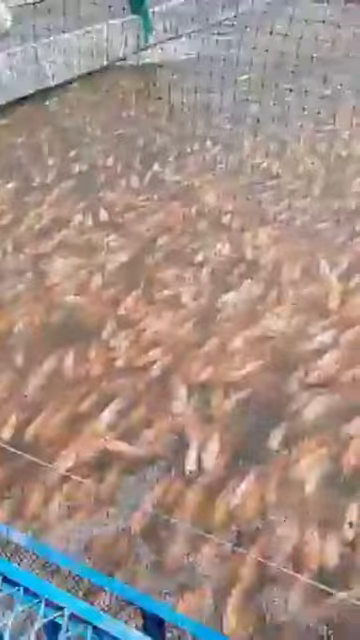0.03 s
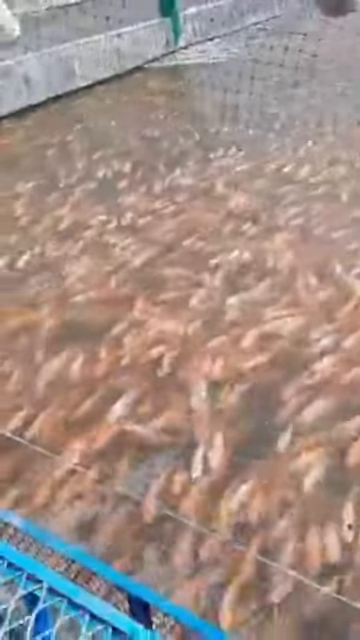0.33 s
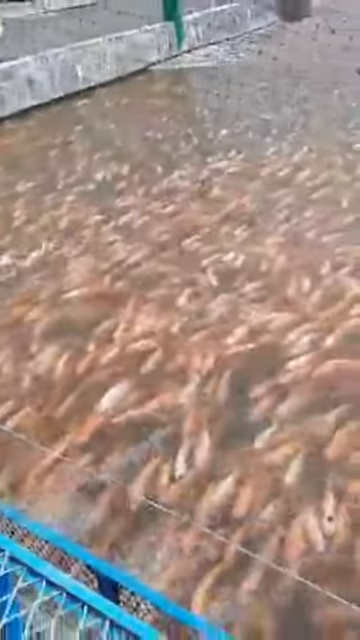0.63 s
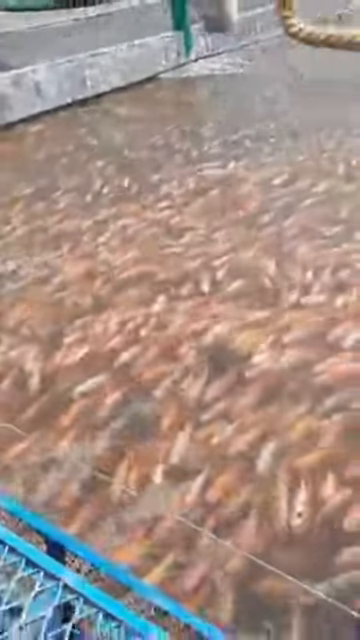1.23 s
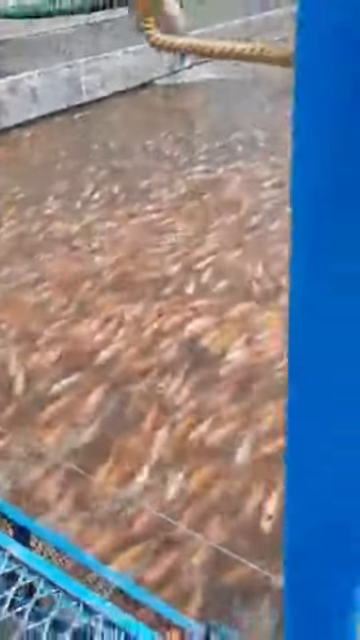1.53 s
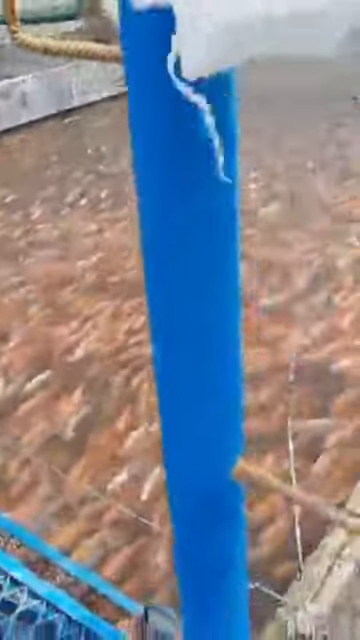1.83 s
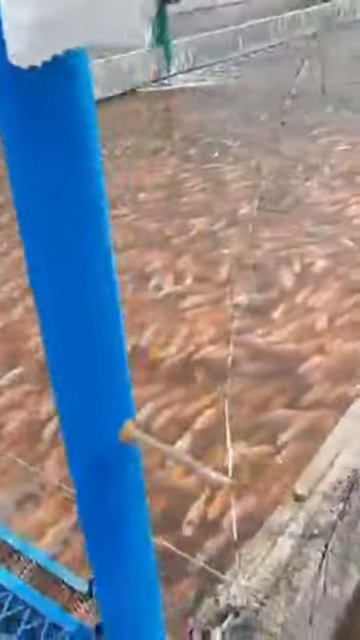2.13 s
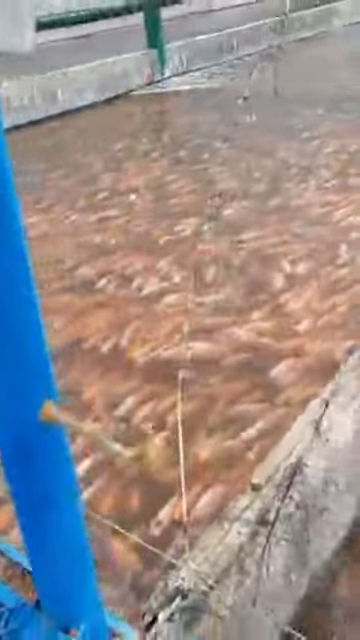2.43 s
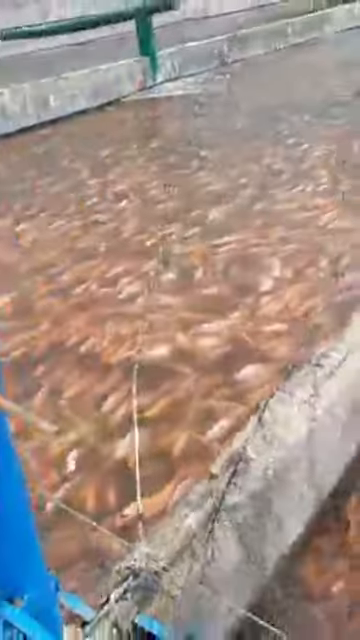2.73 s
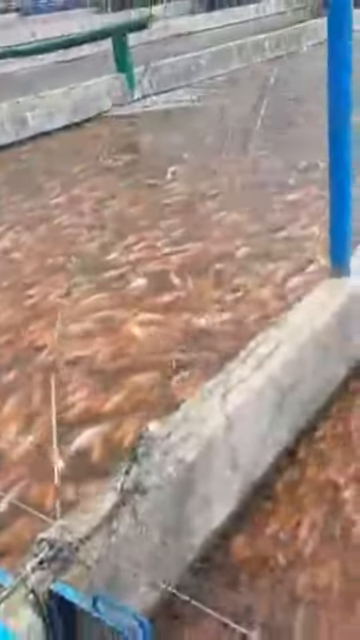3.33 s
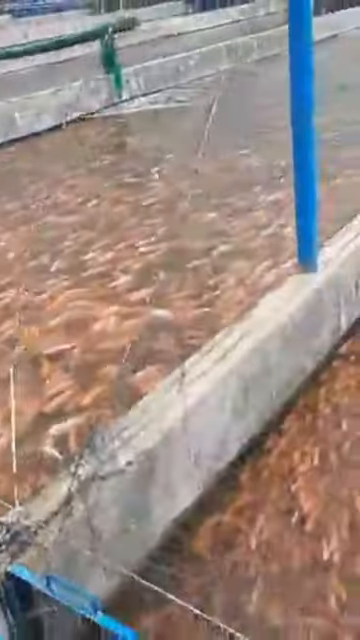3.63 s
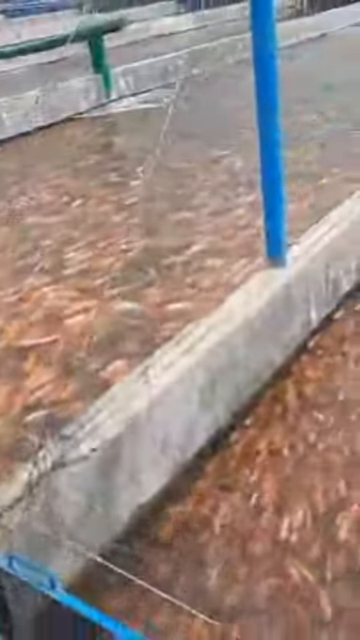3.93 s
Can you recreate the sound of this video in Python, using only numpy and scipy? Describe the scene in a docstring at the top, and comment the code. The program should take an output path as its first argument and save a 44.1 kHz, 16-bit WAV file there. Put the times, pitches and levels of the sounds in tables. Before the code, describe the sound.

Air blowers roar steadily from the right at a fish farm, with a low motor hum and a wavering whine. Aerated water rushes, fizzes and gurgles all around. Everything grows a little louder after about 1 second. Fish splash faintly near 1.7, 2.7 and 2.9 seconds, and the blower rumble swells around 2.4 and 3.1 seconds. A light breeze rumbles on the microphone throughout the 4 seconds.

```python
"""Two air blowers at a fish farm rumble, hum and whine, off to the right. They spin at almost
the same speed, so their tones beat (swell and fade). All around, aerated water rushes as a haze
of tiny ringing bubbles, large bubbles gurgle and fish splash faintly. A light breeze rumbles
on the two spaced microphones that hear it all. The level comes up after the first second."""
import sys
import numpy as np
from scipy import signal
from scipy.fft import rfft, irfft
from scipy.io import wavfile

SR = 44100
rng = np.random.default_rng(int(sys.argv[2]) if len(sys.argv) > 2 else 0)


def waveform_to_disk(signal):
    """Save audio, clipped to [-1, 1], as 16-bit WAV at the path in sys.argv[1]."""
    frames = np.transpose(np.atleast_2d(signal))
    scaled = np.clip(frames, -1, 1) * 32767
    samples = np.round(scaled).astype(np.int16)
    wavfile.write(sys.argv[1], SR, samples)


N = 4 * SR
TIME = np.arange(N) / SR
FREQS = np.arange(N // 2 + 1) * SR / N


def gain(db):
    """Turn decibels into a number to multiply by."""
    return 10 ** (np.asarray(db) / 20)


def fade(rows):
    """A volume that glides through (seconds, dB) points."""
    return gain(np.interp(TIME, *np.array(rows).T))


def shape_tone(sound, rows):
    """Turn low and high pitches up or down along (Hz, dB) points."""
    hz, db = np.array(rows).T
    return irfft(rfft(sound) * gain(np.interp(np.log(FREQS + 1), np.log(hz), db)), N)


def noise_band(hz, width_hz, shape=N):
    """Noise around one pitch, with a typical size of 1."""
    noise = irfft(rfft(rng.standard_normal(shape)) * np.exp(-((FREQS - hz) / width_hz) ** 2), N)
    return noise / noise.std()


def wobble(rate_hz):
    """A slow random drift with a typical size of 1."""
    return noise_band(0, rate_hz)


def from_right(sound, lag_s=.00041):
    """A sound from the right reaches the left microphone a little late."""
    return np.array([irfft(rfft(sound) * np.exp(-2j * np.pi * FREQS * lag_s), N), sound])


# The blowers' air noise. Each row: frequency in Hz, level in dB per Hz.
AIR_TONE = [(20, -97), (40, -101), (58, -84.5), (78, -80), (115, -63.5), (145, -65.5), (190, -60.5),
            (265, -60.5), (350, -69.5), (580, -70.5), (950, -75.5), (1280, -65), (1520, -105),
            (1800, -78.5), (2800, -88.5), (3120, -102), (3450, -91), (4400, -98), (6000, -102)]
# How the rumble swells. Each row: time in seconds, level in dB.
RUMBLE_LEVEL = [(.16, -.5), (.4, 1.5), (.55, -1), (.75, 1.5), (1.1, -1), (1.55, -1.5), (2.2, -.3),
                (2.4, 4.5), (2.6, -.5), (2.7, -.3), (2.85, 2.8), (3.02, -1.5), (3.15, 3), (3.5, -1),
                (4.0, -.5)]
# The notes at which the air pipes boom. Each row: pitch in Hz, width in Hz, level in dB.
PIPE_NOTES = [(190, 14, -48.5), (246, 12, -46.5)]
# How the boom swells. Each row: time in seconds, level in dB.
BOOM_LEVEL = [(.16, -10), (1.2, -7), (1.8, -2), (2.2, 1), (2.4, 6), (2.55, 2), (2.85, 3), (3.0, -5),
              (3.15, 2.5), (3.3, -3), (4.0, -5)]

def blower_roar(throb_db=1.43):
    """Swirling air throbs in the blowers and booms in their pipes."""
    air = shape_tone(rng.standard_normal(N), AIR_TONE) * np.sqrt(SR / 2)
    bass = signal.sosfiltfilt(signal.butter(2, 420, fs=SR, output="sos"), air)
    boom = sum(gain(db) * noise_band(hz, width) for hz, width, db in PIPE_NOTES)
    rumble = bass * fade(RUMBLE_LEVEL) * gain(throb_db * wobble(3.5))
    return from_right(air - bass + rumble + boom * fade(BOOM_LEVEL))


# The fan wheels' tones. Each row: pitch in Hz, level in dB, how many dB quieter the second
# blower is, delay at the left microphone in seconds.
WHINE_TONES = [(1013, -49.3, 11, .00029), (1025, -58, 15, .00029), (1146, -62, 12, .00042),
               (1220, -60, 12, .00043), (1266, -45.3, 5, .00047), (1297, -59, 8, .00043),
               (1322, -62, 10, .00042), (1531, -56.5, 10, .00044), (1649, -50.8, 14, .00042),
               (1967, -61.5, 10, .00046), (2167, -59.5, 10, .00043), (2285, -62.5, 10, .0004),
               (2978, -65, 8, .00048), (3047, -59, 12, .00045), (3072, -55.5, 12, .00047),
               (3096, -56, 12, .00048), (3181, -57, 6, .00047), (3264, -63, 7, .00045),
               (3555, -60.5, 10, .00046), (3758, -57.2, 12, .00045), (3876, -65.5, 10, .00045),
               (4075, -66, 10, .00042), (4194, -61.5, 12, .00042), (4393, -62, 12, .00041),
               (5348, -69, 6, .00043), (6365, -67, 6, .00043)]
# Volume of the main whines, the high ones, the rest, and the second blower as it comes into
# earshot. Each row: time in seconds, level in dB.
MAIN_WHINE_LEVEL = [(.16, 4), (.9, 3.2), (1.3, .5), (2.2, -.3), (4.0, .3)]
HIGH_WHINE_LEVEL = [(.16, -2.5), (1.0, -2.5), (1.6, -1), (2.6, -2), (4.0, -3.5)]
OTHER_WHINE_LEVEL = [(.16, 0), (1.0, 2), (1.5, -3), (2.6, 1), (4.0, -2.5)]
SECOND_BLOWER_LEVEL = [(.8, -12), (1.3, 0)]

def fan_whine(clock, slower_by=.00243, echo_db=-10):
    """Each tone beats with its twin from the slower blower, and a wavering echo comes off the basins."""
    whine = 0
    for hz, db, quieter_db, lag_s in WHINE_TONES:
        if hz > 3000:
            level, flutter_db = HIGH_WHINE_LEVEL, 2.2
        elif 1100 < hz < 1800:
            level, flutter_db = MAIN_WHINE_LEVEL, .8
        else:
            level, flutter_db = OTHER_WHINE_LEVEL, .8
        first = np.exp(2j * np.pi * (hz * clock + rng.random()))
        second = first * np.exp(-2j * np.pi * hz * slower_by * clock)
        second *= fade(SECOND_BLOWER_LEVEL) * gain(-quieter_db)
        delay = np.exp(-2j * np.pi * hz * np.array([[lag_s], [0]]))
        direct = delay * gain(flutter_db * wobble(4.9))
        echo = np.array([wobble(8) + 1j * wobble(8) for side in range(2)])
        echo *= gain(echo_db) * np.sqrt(hz / 3000)  # high tones scatter more
        whine += gain(db) * fade(level) * ((first + second) * (direct + echo)).real
    return whine


# The motors' low tones. Each row: pitch in Hz, level in dB.
HUM_TONES = [(59, -56.5), (118, -55), (179, -51), (210, -57), (318, -52.5), (377, -56.5), (416, -61.5)]

def blower_motors(in_step_s=1.55, speed_drift=.00015):
    """The motors hum and spin the whining fans; all their pitches drift together with the speed."""
    clock = TIME - in_step_s + speed_drift * np.cumsum(wobble(5.7)) / SR
    hum = 0
    for hz, db in HUM_TONES:
        hum += gain(db + 2 * wobble(20)) * np.sin(2 * np.pi * (hz * clock + rng.random()))
    return np.sqrt(2) * (from_right(hum) + fan_whine(clock))


def bubbles(hz, per_second=600, ring_cycles=4, scatter_db=1):
    """Countless bubbles of one size ring briefly, a few louder than the rest."""
    born = rng.random(N) < per_second / SR
    pops = born * rng.standard_normal(N) * gain(scatter_db * np.minimum(rng.exponential(size=N), 4))
    ring_step = np.exp(hz / SR * (2j * np.pi - 1 / ring_cycles))  # turns each pop into a dying tone
    rings = signal.lfilter([1], [1, -ring_step], pops).imag
    return rings / rings.std()


# The rush of the water. Each row: frequency in Hz, level in dB per Hz.
WATER_TONE = [(20, -102), (60, -75), (130, -98), (250, -76), (500, -75.5), (900, -74), (1500, -77),
              (2100, -77.5), (2850, -78.5), (3500, -83.5), (4100, -83), (4500, -87.5), (4850, -83),
              (5600, -84), (6500, -81.5), (8100, -83.5), (10000, -89.5), (13000, -100.5)]
# How the fizz in the water's middle pitches swells. Each row: time in seconds, level in dB.
FIZZ_LEVEL = [(.16, 0.5), (1.0, 2), (2.1, 0.5), (2.4, 3.4), (2.75, 1), (3.1, -1.2), (3.6, 2), (4.0, 1)]

def rushing_water(bubble_share=.29, surge_db=1, flicker_db=1.34):
    """Bubbles flicker over a smooth rush, different at each microphone, while the flow surges."""
    surge = gain(surge_db * wobble(19))
    pitches = np.geomspace(400, 12500, 22)
    water = np.zeros((2, N))
    for side in range(2):
        haze = 0
        for hz, width in zip(pitches, np.gradient(pitches)):
            haze += bubbles(hz) * np.sqrt(width) * gain(flicker_db * wobble(6.9))
        rush = rng.standard_normal(N) * np.sqrt(SR / 2)
        blend = np.sqrt(bubble_share) * haze + np.sqrt(1 - bubble_share) * rush
        water[side] = shape_tone(blend, WATER_TONE)
    fizz = signal.sosfiltfilt(signal.butter(2, (1400, 3300), "bandpass", fs=SR, output="sos"), water)
    return (water + fizz * (fade(FIZZ_LEVEL) - 1)) * surge


def plop(start_s, hz, decay_s, sag_per_s=1.5):
    """An air pocket rings as its pitch sags. Gives its rise and fall, and its tone on both sides."""
    live = (TIME > start_s) & (TIME < start_s + 10 * decay_s)
    age = TIME[live] - start_s
    swell, ring = np.zeros(N), np.zeros((2, N))
    swell[live] = 2 * age / decay_s * np.exp(1 - 2 * age / decay_s)
    cycles = hz * (age - sag_per_s * age ** 2 / 2) + rng.random()
    side_shift = rng.random((2, 1)) / np.pi
    ring[:, live] = np.sqrt(2) * np.sin(2 * np.pi * (cycles + side_shift))
    return swell, ring


# How strongly the water gurgles. Each row: time in seconds, level in dB.
GURGLE_LEVEL = [(.16, -5), (1.0, -3), (1.7, 0), (2.4, 1), (4.0, 0)]

def gurgles(per_second=70, low_hz=430, high_hz=850):
    """Large bubbles plop at random in the churning water."""
    sound = 0
    for when, pitch, force in rng.random((int(per_second * N / SR), 3)):
        swell, ring = plop(when * N / SR, low_hz * (high_hz / low_hz) ** pitch, decay_s=.008)
        sound += gain(-52 + 4 * force) * swell * ring
    return sound * fade(GURGLE_LEVEL)


# Air pockets under splashing fish.
# Each row: start in seconds, pitch in Hz, level in dB, fading time in seconds.
FISH_PLOPS = [(1.678, 665, -38.5, .009), (1.704, 2470, -38.5, .007), (1.717, 660, -38.5, .009),
              (2.723, 610, -42, .010), (2.892, 640, -38, .010)]

def fish_splashes(spatter_db=-7):
    """Fish flip at the surface: each flip gives a plop and a little spatter."""
    sound = 0
    for start_s, hz, db, decay_s in FISH_PLOPS:
        swell, ring = plop(start_s, hz, decay_s)
        spatter = gain(spatter_db) * noise_band(hz, width_hz=.15 * hz, shape=(2, N))
        sound += gain(db) * swell * (ring + spatter)
    return sound


# The breeze's rumble. Each row: frequency in Hz, level in dB per Hz.
BREEZE_TONE = [(20, -100), (45, -83.5), (100, -68.5), (160, -70.5), (400, -77.5), (1000, -115)]
# The strength of its puffs. Each row: time in seconds, level in dB.
PUFF_LEVEL = [(.16, 4.5), (.8, 0), (1.05, 6.5), (1.5, 5.5), (2.1, 1.5), (2.7, -4), (3.3, 2), (3.9, 0.5)]

def breeze():
    """Light puffs of air rumble on the microphones, mostly alike on both."""
    noise = rng.standard_normal(N) + .17 * rng.standard_normal((2, N))
    air = shape_tone(noise * np.sqrt(SR / 2), BREEZE_TONE)
    return air * fade(PUFF_LEVEL) * gain(wobble(6.6))


def scene():
    """Blowers, water, fish and breeze together, as left and right channels."""
    return blower_roar() + blower_motors() + rushing_water() + gurgles() + fish_splashes() + breeze()


# The tone of the microphones. Each row: frequency in Hz, left level in dB, right level in dB.
MIC_TONE = [(249, -1.2, -1.84), (880, -0.4, 0.05), (2030, -0.44, -0.26), (4770, 2, 4.5), (5670, 2, 3.5),
            (5800, -15, 5), (6600, 2, 4), (6800, -18, 5), (8020, -0.5, 3), (8500, 2, -2), (8970, 1, -3),
            (9330, 1.5, -25), (10600, 0, -23), (11100, 4.5, -3.5), (13000, 3, -6)]
# The volume of the whole sound. Each row: time in seconds, level in dB.
OVERALL_LEVEL = [(.16, -5), (.55, -4), (.95, -4), (1.2, -1.5), (1.45, -0.5), (2.0, 0.5), (2.5, -0.7),
                 (3.0, 0.5), (3.5, 0.5), (4.0, 0.5)]

def record(dry, start_s=.158, top_hz=13100):
    """Each microphone has its own tone; the sound cuts in, grows louder and lacks the highest treble."""
    mics = np.array(MIC_TONE)
    left = shape_tone(dry[0], mics[:, [0, 1]])
    right = shape_tone(dry[1], mics[:, [0, 2]])
    heard = np.array([left, right]) * fade(OVERALL_LEVEL) * (TIME >= start_s)
    return signal.sosfilt(signal.ellip(10, .2, 70, top_hz, fs=SR, output="sos"), heard)


dry = scene()
out = record(dry)
waveform_to_disk(out)
```